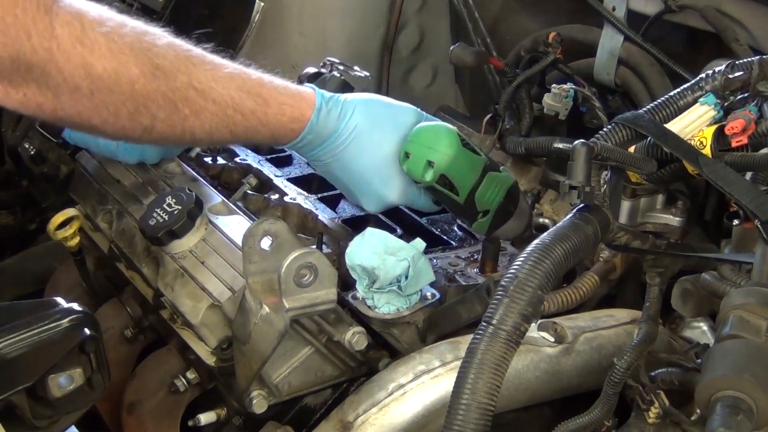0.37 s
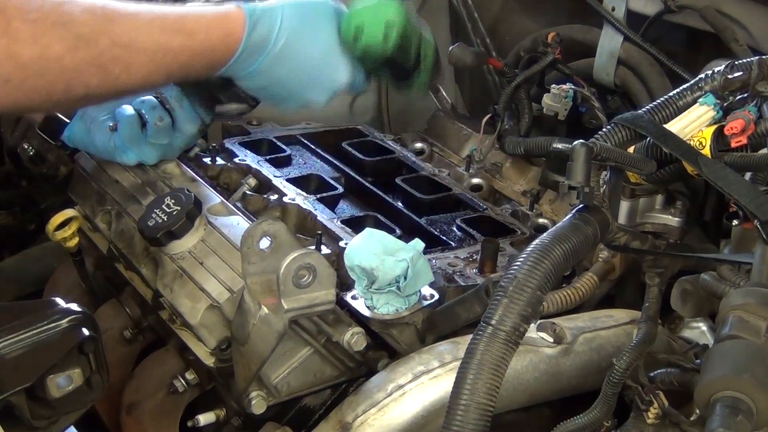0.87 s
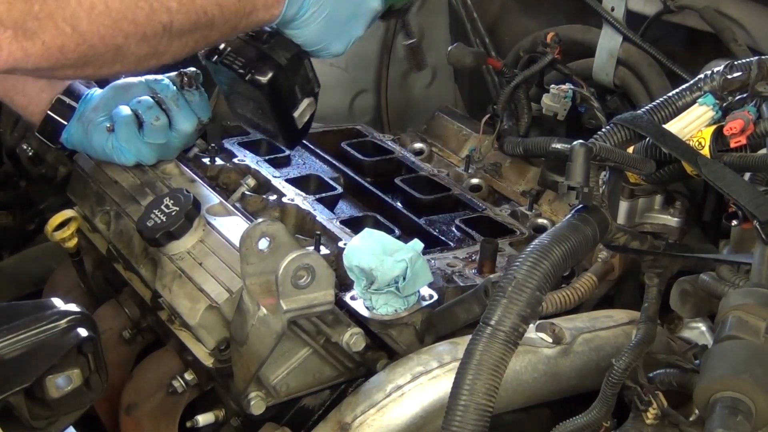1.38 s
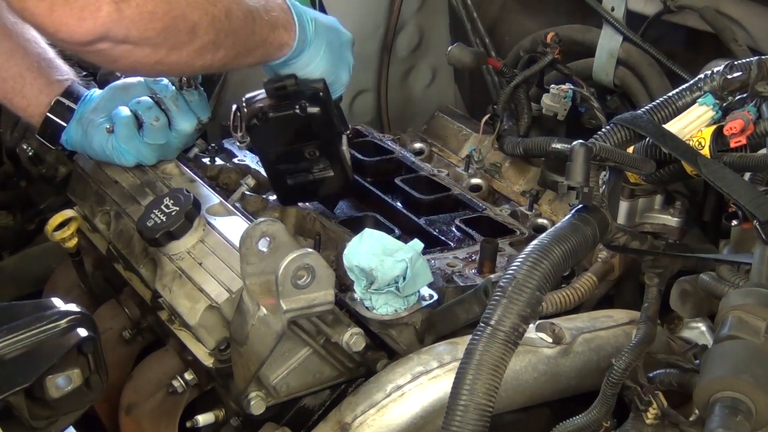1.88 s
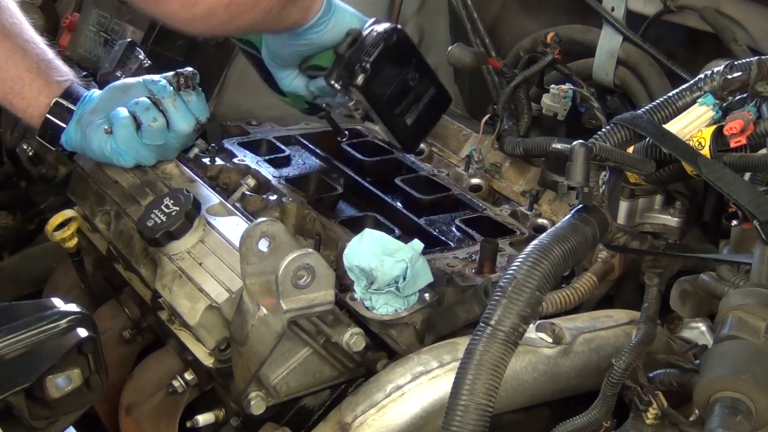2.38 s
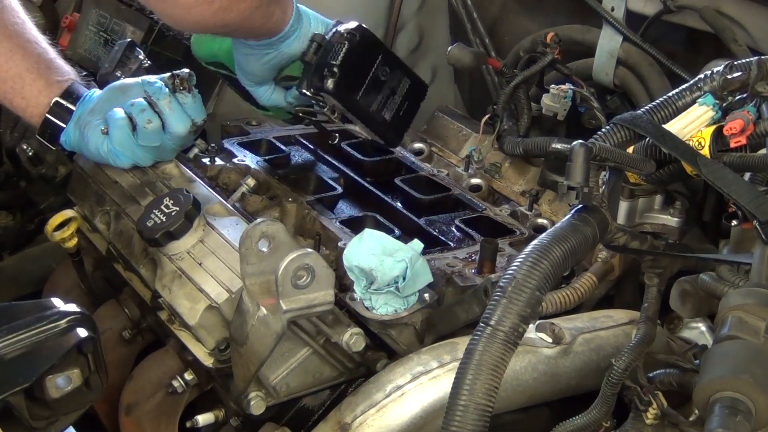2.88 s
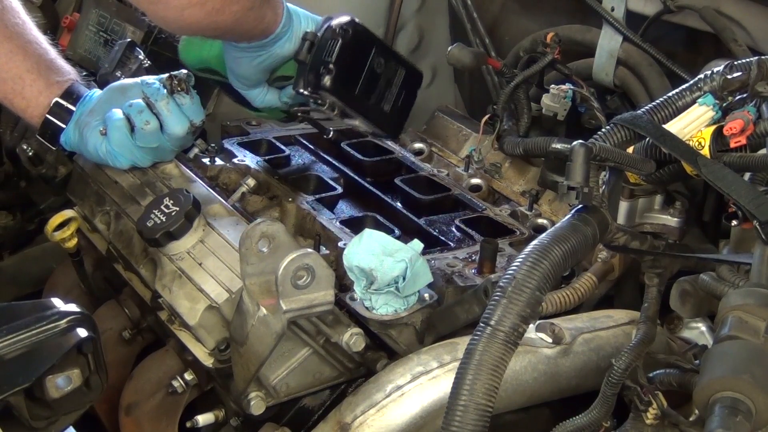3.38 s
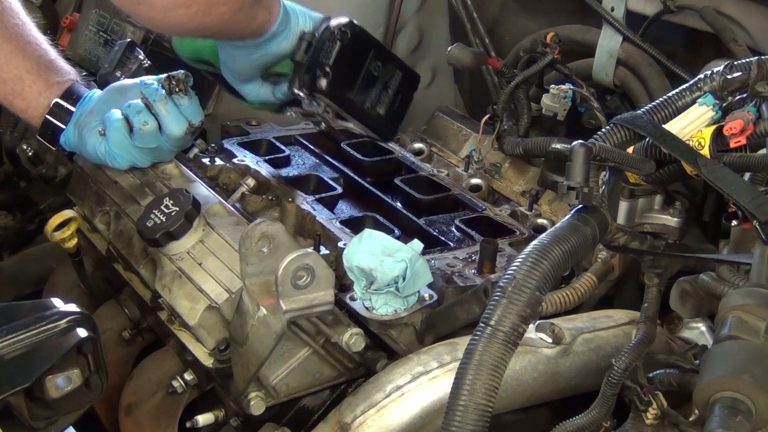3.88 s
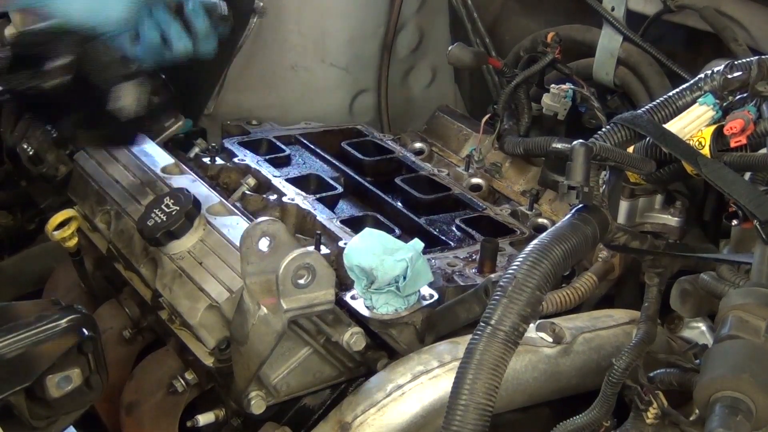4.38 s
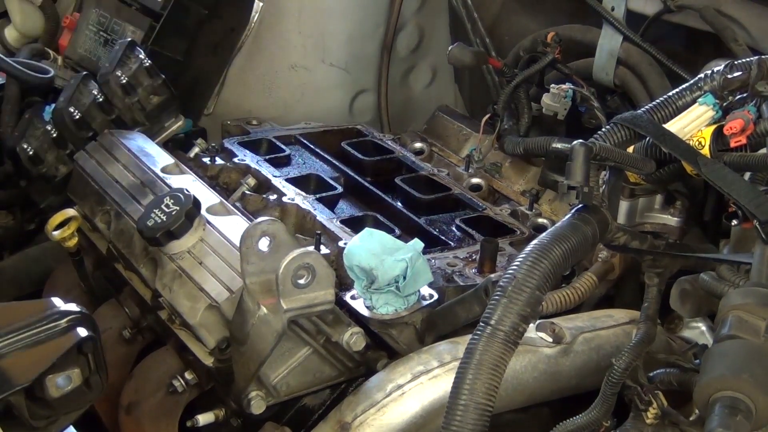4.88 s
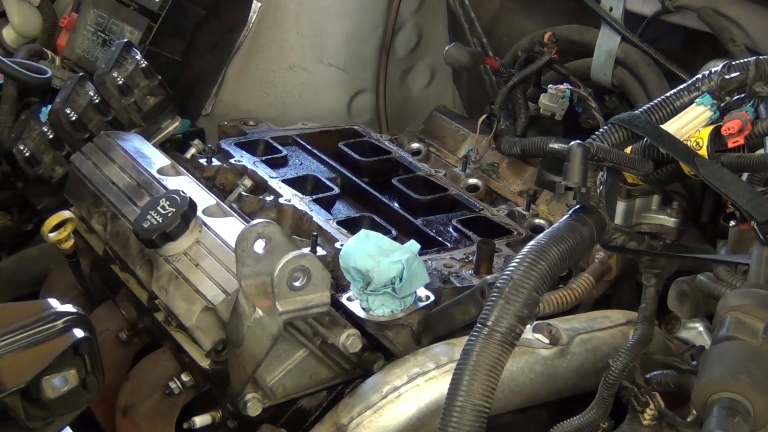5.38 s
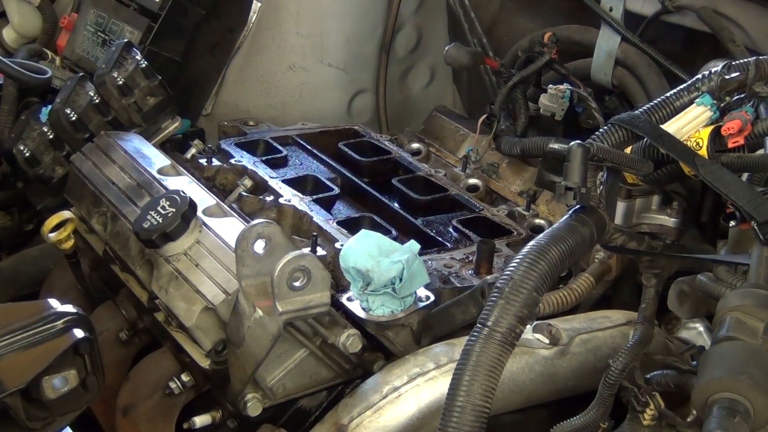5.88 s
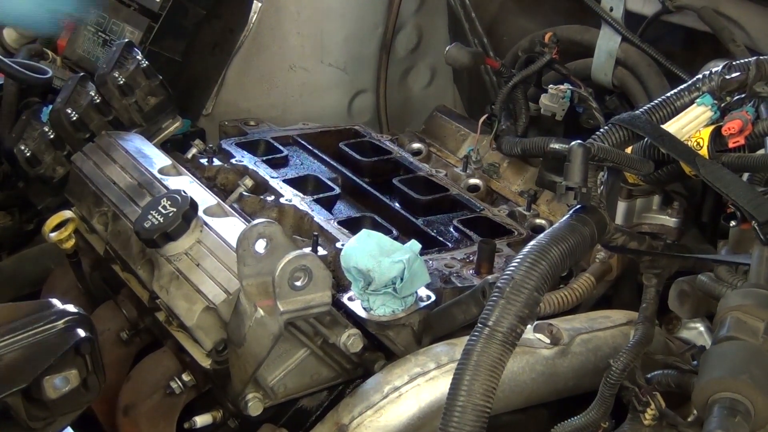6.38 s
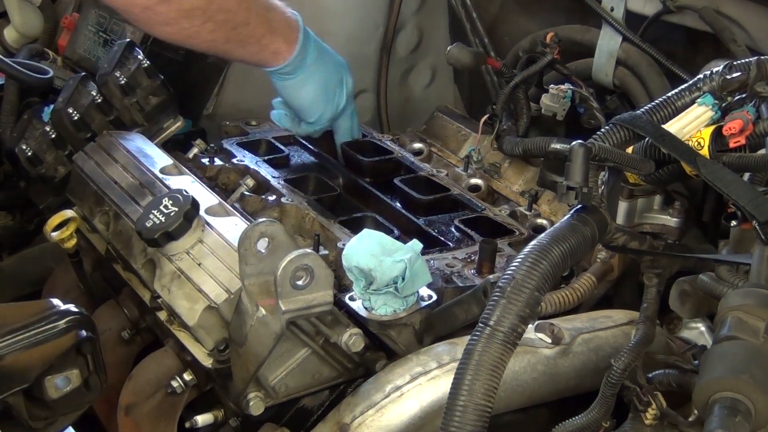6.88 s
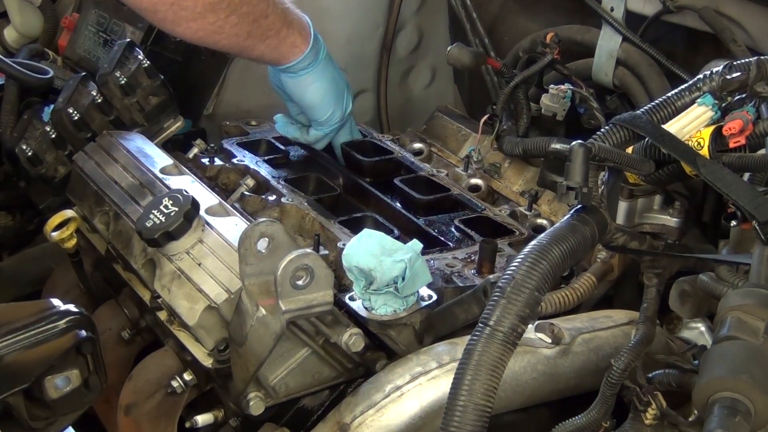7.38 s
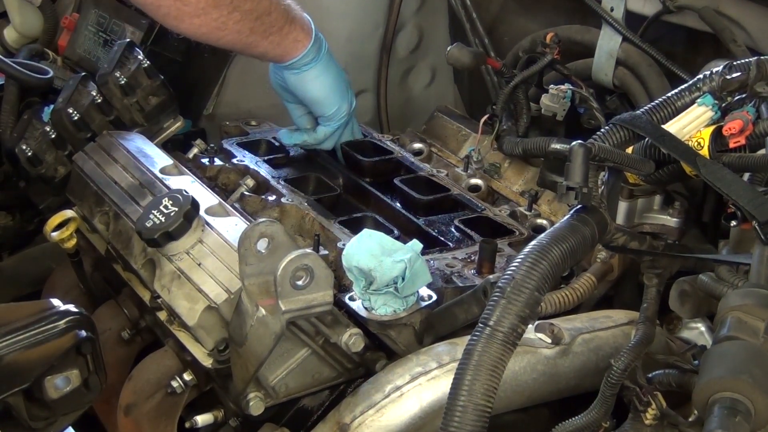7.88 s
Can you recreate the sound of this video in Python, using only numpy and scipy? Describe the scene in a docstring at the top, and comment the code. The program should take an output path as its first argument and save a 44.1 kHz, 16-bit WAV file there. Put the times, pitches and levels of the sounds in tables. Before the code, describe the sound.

In a garage with steady fan air and faint mains hum, small metal clicks lead to a cordless driver's short rising whir, cut off by its brake. A second, slightly shorter burst follows. Parts scrape and tick, then drop loudly into a thin metal tray, which clatters, rings and thuds twice. Faint glove rustles end it. Close stereo microphone, driver central, moderate hard-walled echo.

```python
"""A garage, where a small cordless driver runs two short bursts over an engine. Its speed control whines,
its gear teeth gate hiss and casing noise and sound tones at multiples of the mesh rate, and a brake ends each.
Bit and bolts tick on metal as cracks, rings and knocks; friction grains scrape and rustle as parts rub.
Parts dropped into a sheet-metal tray excite its modes and rattle. Mains harmonics and filtered fan noise
fill the room, and the walls return decaying echoes."""
import sys
import numpy as np
from scipy import signal
from scipy.fft import rfft, irfft, next_fast_len
from scipy.io import wavfile
from scipy.ndimage import uniform_filter1d, map_coordinates

SR = 44100
rng = np.random.default_rng(int(sys.argv[2]) if len(sys.argv) > 2 else 0)


def gain_from_decibels(decibels):
    """Convert decibel values to linear amplitude factors."""
    exponent = np.asarray(decibels, float) / 20
    return 10 ** exponent


def master(y):
    """Save y as 16-bit WAV."""
    cut = np.clip(np.atleast_2d(y).T, -1, 1)
    pcm = np.round(cut * 32767)  # scale
    wavfile.write(sys.argv[1], SR, pcm.astype(np.int16))


N = 352623
T = np.arange(N) / SR

# Spectra give relative dB per Hz, since each noise is afterwards scaled to its level.
# Fan air. Each row: frequency in Hz, density in dB per Hz.
AIR_SPECTRUM = [(15, -64), (25, -26), (102, -10.5), (301, -9), (363, -9), (659, -9.5), (1130, -13.5),
                (1520, -9), (2160, -18), (2990, -17.5), (3920, -19.5), (4370, -20), (7920, -22),
                (11000, -21), (16000, -21.5)]
# Resonances of the fan housing. Each row: centre in Hz, width in Hz, gain in dB.
HOUSING_MODES = [(430, 71, 5.5), (1526, 146, 6), (3027, 94, 10.5), (4420, 164, 7), (5850, 100, 5.5),
                 (10000, 370, 5.5), (10680, 200, 8.5), (11500, 370, 6.5), (12600, 230, 6.5),
                 (14000, 400, 3.5)]
# Width of the fan air. Each row: frequency in Hz, side over mid in dB.
AIR_SIDE_LEVEL = [(60, -33), (180, -18), (550, -12), (1650, -7), (4970, -5), (15000, -8.5)]
# Balance of the background. Each row: frequency in Hz, left over right in dB.
AIR_BALANCE = [(60, -0.5), (180, 1), (550, 0.5), (1650, 2.5), (4970, 0.5), (15000, 0.5)]
# Mains hum. Each row: multiple of 120 Hz, level in dB.
MAINS_HARMONICS = [(1, -73.5), (2, -69.5), (3, -57.5), (4, -62), (6, -69), (10, -87), (11, -67.5),
                   (13, -73.5), (15, -69.5), (17, -72.5), (19, -78), (20, -80), (24, -72)]
# A thin high whistle. One row: frequency in Hz, level in dB.
WHISTLE = (15734, -77)

# Reverberation. Each row: frequency in Hz, time to decay by 60 dB in seconds.
GARAGE_T60 = [(150, 0.92), (1000, 0.95), (3000, 0.63), (8000, 0.44), (15000, 0.063)]
# Width of the reverberation. Each row: frequency in Hz, side over mid in dB.
GARAGE_SIDE_LEVEL = [(200, -16), (1000, -12.5), (3000, -10.5), (6000, -15), (12000, -36)]

# Gloves and loose parts rubbing. Each row: start in seconds, length in seconds, scrape in dB, rustle in dB.
RUB_STROKES = [(1.002, 0.12, -56, -52), (2.368, 0.086, -62, -68), (4.542, 0.082, -59, -57),
               (4.858, 0.027, -39, -56), (4.896, 0.057, -44.5, -51), (5.03, 0.083, -46, -64),
               (5.085, 0.057, -49, -66), (5.393, 0.045, -50, -70), (6.791, .05, -55, -56),
               (7.02, .08, -55, -64), (7.232, 0.044, -58, -67)]
# Dull part of the friction. Each row: frequency in Hz, density in dB per Hz.
SCRAPE_SPECTRUM = [(400, -48), (800, 5), (2200, -6), (4500, -10), (7000, -18)]
# Bright part of the friction. Each row: frequency in Hz, density in dB per Hz.
RUSTLE_SPECTRUM = [(2500, -28), (5500, -7), (10000, 6), (14000, -9), (16000, -20)]

# Contacts of small parts. Each row: start in seconds, level in dB, ring in Hz,
# knock in dB relative to that level, knock in Hz.
CONTACTS = [(0.3907, -24.5, 4280, -35, 1310), (0.401, -25.5, 4280, -30, 750),
            (0.4044, -43, 4480, -25, 1290), (0.6194, -43.5, 1980, 1, 483), (1.8277, -39.5, 2190, -3, 950),
            (2.0063, -35, 2280, 3, 797), (2.0104, -38, 2780, 5.5, 548), (2.1234, -25, 5330, -12, 630),
            (2.3339, -28.5, 4460, -8, 1140), (2.3468, -21, 2160, 2.5, 750), (2.5087, -31, 8400, -23, 720),
            (2.8924, -13.5, 3710, -7.5, 840), (3.6671, -28, 3880, -1.5, 535), (4.2, -38.5, 10000, -23, 482),
            (4.5359, -40, 4300, 6.5, 2400), (4.8502, -17.5, 1850, 2, 862), (4.8843, -28, 4800, -6, 750),
            (4.903, -23.5, 6200, -9, 1440), (4.9364, -32, 1830, 1, 850), (5.0, -24.5, 1770, -1, 825),
            (5.0844, -48, 3900, 7, 2240), (5.1094, -50, 810, 12, 2210), (5.3914, -44, 2900, 17, 1210),
            (5.6385, -7, 3970, -25, 1104), (6.0176, -26.5, 1740, 6, 470)]
# First crack of a contact. Each row: frequency in Hz, density in dB per Hz.
CRACK_SPECTRUM = [(400, -3.5), (1500, 0.5), (4000, 0.5), (9000, -4.5), (13000, -5.5), (16000, -20)]
CRACK_T60_S, RING_T60_S, KNOCK_T60_S = 0.041, 0.025, 0.039
# Place of the small and dropped parts. Each row: time in seconds, left over right in dB.
PARTS_BALANCE = [(.4, -3.5), (2.3, 2), (3.6, 2), (5, 3.5), (5.6, 2.5)]

# Modes of the tray. Each row: frequency in Hz, relative level in dB, time to decay by 60 dB in seconds.
TRAY_MODES = [(1050, -7, 0.88), (1110, -5, 0.3), (1565, 7.5, 0.6), (1840, 0, 0.4), (2040, -1, 0.52),
              (2400, -12, 0.39), (2584, -9, 0.32), (2590, -20, 0.48), (2925, -1, 0.45), (3520, -3, 0.51),
              (4040, -14, 0.7), (4100, -1, 0.61), (4260, -19, 0.58), (4807, -5, 0.59), (4775, 1, 0.23),
              (5690, 5, 0.21), (6640, -16, 0.24), (6713, -22, 0.39), (7340, -18, 0.41), (7350, -3.5, 0.33),
              (7680, 11, 0.053), (8600, -14, 0.28)]
# Landings in the tray. Each row: start in seconds, level in dB, softness in dB taken off the clatter.
TRAY_LANDINGS = [(5.638, 0.5, 1), (5.658, 5, 11), (5.703, 4.5, 41.5), (5.96, -5, 26), (6.001, -1.5, 27.5),
                 (6.028, -2.5, 49.5)]
# Layers of a landing: clatter, body, thud, boom. Each row: level in dB, share of the softness lost
# (negative: gained), rise constant in seconds, time to decay by 60 dB in seconds.
LANDING_LAYERS = [(-15.5, 1, 0.0033, 0.33), (-17.5, 0.48, 0.0097, 0.22), (-30.5, 0.08, 0.0063, 0.25),
                  (-51, -0.5, .022, 0.24)]
# Rattle of the sheet. Each row: frequency in Hz, density in dB per Hz.
CLATTER_SPECTRUM = [(1060, -49), (1800, -8.5), (2690, 0), (4450, -4.5), (7420, -10), (13900, -24),
                    (15300, -40), (16000, -81)]
# Middle range of a landing. Each row: frequency in Hz, density in dB per Hz.
BODY_SPECTRUM = [(500, -28), (850, -0.5), (1410, 0.5), (1580, -5.5), (2200, -16), (2860, -38), (4840, -120)]
# Low blow of a landing. Each row: frequency in Hz, density in dB per Hz.
THUD_SPECTRUM = [(210, -50), (350, -30), (459, -2), (626, -9), (950, -11), (1240, -32), (2090, -120)]
# Deepest part of a landing. Each row: frequency in Hz, density in dB per Hz.
BOOM_SPECTRUM = [(47, -56), (80, -22), (188, -1.5), (297, -5), (329, -5), (420, -1.5), (550, -39.5),
                 (920, -120)]

# Rotor speed, one list for each burst. Each row: time in seconds, gear mesh rate in Hz.
ROTOR_SPEED = [
    [(2.524, 530), (2.545, 980), (2.575, 1420), (2.591, 1625), (2.61, 1675), (2.7, 1780), (2.783, 1842),
     (2.85, 1712), (2.88, 1620)],
    [(3.25, 108), (3.264, 230), (3.274, 500), (3.294, 880), (3.317, 1170), (3.348, 1635), (3.375, 1715),
     (3.41, 1685), (3.47, 1540)],
]
# Levels at full speed, one row for each burst. Each row: start of braking in seconds, hiss in dB,
# casing noise in dB, second-order whine in dB, other orders in dB.
BURST_LEVELS = [(2.855, -18, -26.5, -26, -32.5), (3.443, -18, -34, -27.5, -32)]
# Weaker tones of the mesh. Each row: multiple of the mesh rate, dB relative to the other-orders level.
MESH_TONES = [(1, 0), (3, 2), (4, -2), (5, -4), (6, -1)]
# Low tones in the casing. Each row: multiple of the mesh rate, dB relative to the casing noise level.
SHAFT_TONES = [(1 / 8, -29.5), (2 / 8, -23), (.81, -10)]
# Case modes that the rising tones pass. Each row: centre in Hz, width in Hz, gain in dB.
WHINE_MODES = [(1450, 250, 0.5), (2340, 83, 13.5)]
# Hiss of the teeth. Each row: frequency in Hz, density in dB per Hz.
HISS_SPECTRUM = [(820, -32.5), (1400, -4), (2890, -11.5), (3610, -8.5), (3960, -9), (5320, -2.5),
                 (6330, -10.5), (7300, -7.5), (10500, -5.5), (14600, -14.5), (16000, -24)]
# Gear case resonances that colour the hiss. Each row: centre in Hz, width in Hz, gain in dB.
GEAR_CASE_MODES = [(1550, 710, -1.5), (2300, 250, 3.5), (3240, 470, 5), (5300, 630, -3.5), (7080, 320, 4),
                   (8800, 310, 1.5), (9600, 790, 2.5)]
# Casing noise. Each row: frequency in Hz, density in dB per Hz.
CASING_SPECTRUM = [(59, -69), (100, -60), (207, -8.5), (262, -17.5), (446, -6), (489, -11.5), (599, -2.5),
                   (718, 3.5), (964, -2.5), (1500, -8), (1950, -39), (3300, -120)]
# Speed control as the rotor starts. Each row: start in seconds, length in seconds, level in dB, climb in Hz.
SPEED_CONTROL = [(2.514, 0.014, -39, 1300), (3.229, 0.033, -39, 300)]
FULL_HZ, ENGAGED_HZ = 1740, 463  # mesh rate at full speed; below the second the teeth barely load
HISS_DB_PER_OCTAVE, CASING_DB_PER_OCTAVE, ORDERS_DB_PER_OCTAVE = 2, 12.5, 3
IDLE_DB_PER_OCTAVE = 9.5  # further loss of noise below the engaged rate
WHINE_STARTS_HZ, WHINE_RISE_DB_PER_OCTAVE = 930, 45  # the tones set in steeply up to this mesh rate
SLOWING_DB_PER_OCTAVE = 40  # tones fade as the rotor sags below its best speed
BRAKE_TONES_DB_PER_S, BRAKE_NOISE_DB_PER_S = 900, 198
CHOPPER_HZ = 5030  # starting pitch of the speed control


def unit(x):
    """Normalisation to rms 1."""
    return x / np.sqrt(np.mean(x ** 2) + 1e-20)


def along(points, hz):
    """Interpolation of (Hz, value) points on a logarithmic frequency axis."""
    f, v = np.transpose(points)
    return np.interp(np.log(hz + 1), np.log(f + 1), v)


def wobble(rate, size):
    """A smooth random curve through normal deviates, rate knots a second."""
    knots = rng.standard_normal(int(size * rate / SR) + 4)
    return map_coordinates(knots, [np.arange(size) * rate / SR])


def filtered(x, response):
    """Linear filtering: the spectrum of x times a response of frequency."""
    m = next_fast_len(x.shape[-1] + 8192)
    spectrum = rfft(x, m) * response(np.fft.rfftfreq(m, 1 / SR))
    return irfft(spectrum, m)[..., :x.shape[-1]]


def coloured(x, spectrum):
    """Noise shaped by a spectrum, then set to rms 1."""
    return unit(filtered(x, lambda hz: gain_from_decibels(along(spectrum, hz))))


def lift(modes, hz):
    """Resonance: unit gain with a hump at each mode."""
    return 1 + sum((gain_from_decibels(db) - 1) / (1 + (2 * (hz - c) / w) ** 2) for c, w, db in modes)


def patchy(x, patch_db):
    """Random gain in small patches of time and frequency."""
    z = signal.stft(x, nperseg=128)[2]
    field = uniform_filter1d(rng.standard_normal(z.shape), size=2, axis=0)
    field = uniform_filter1d(field, size=5, axis=1)
    return signal.istft(z * gain_from_decibels(patch_db * unit(field)), nperseg=128)[1][:len(x)]


def swell(length_s, attack):
    """An envelope that rises over a share of its length, then falls back to silence."""
    u = T[:round(length_s * SR)] / length_s
    return np.sin(np.pi / 2 * np.minimum(u / attack, (1 - u) / (1 - attack))) ** 2


def add(track, first, sound):
    """Superposition of a sound on the track from its first sample."""
    track[first:first + len(sound)] += sound


def wide(pair):
    """Sum and difference of mid and side give left and right."""
    return np.array([pair[0] + pair[1], pair[0] - pair[1]])


def background():
    """Broadband fan air resonates in its housing; unsteady mains harmonics and a whistle join it (mid, side)."""
    def response(hz):
        side = gain_from_decibels(along(AIR_SIDE_LEVEL, hz))
        return gain_from_decibels(along(AIR_SPECTRUM, hz)) * lift(HOUSING_MODES, hz) * np.array([np.ones_like(side), side])

    pair = filtered(rng.standard_normal((2, N)), response)
    air = gain_from_decibels(-49.5 + 0.14 * wobble(3.34, N)) * pair / np.std(pair[0])
    for hz, db in [(120 * k, db) for k, db in MAINS_HARMONICS] + [WHISTLE]:
        level = np.sqrt(2) * gain_from_decibels(db + 2.66 * wobble(6, N))
        air[0] += level * np.sin(2 * np.pi * (hz * T + rng.random()))
    return air


def garage(x):
    """Reverberation as convolution with decaying noise, shorter in the treble and redrawn in steps (mid, side)."""
    out, step = np.zeros((2, N + 2 * SR)), SR // 8
    delay = 250  # samples before the echo begins
    for first in range(0, N, step):
        hz, t, z = signal.stft(rng.standard_normal((2, SR * 3 // 4)), SR, nperseg=256)
        z[1] *= gain_from_decibels(along(GARAGE_SIDE_LEVEL, hz))[:, None]
        walls = gain_from_decibels(-60 * t / along(GARAGE_T60, hz)[:, None])
        nearby_metal = gain_from_decibels(-0.5 - 60 * t / 0.047)
        tail = signal.istft(z * (walls + nearby_metal), SR, nperseg=256)[1]
        tail /= np.linalg.norm(tail[0])
        wet = signal.fftconvolve(x[None, first:first + step], tail, axes=1)
        out[:, first + delay:first + delay + wet.shape[1]] += wet
    return out[:, :N]


def rubs():
    """Friction as clumped random grains, heard as a dull scrape and a bright rustle."""
    out, size = np.zeros(N), SR // 4
    for s, length_s, scrape_db, rustle_db in RUB_STROKES:
        stroke = swell(length_s, attack=0.25)
        grains = gain_from_decibels(3.1 * wobble(203.0, size)) * rng.standard_normal((2, size))
        scrape = gain_from_decibels(scrape_db) * coloured(grains[0], SCRAPE_SPECTRUM)
        rustle = gain_from_decibels(rustle_db) * coloured(grains[1], RUSTLE_SPECTRUM)
        add(out, round(s * SR), stroke * (scrape + rustle)[:len(stroke)])
    return out


def ticks():
    """Impact excites a crack, a short ring of the small part and a knock of what it touches."""
    out, t = np.zeros(N), T[:SR // 5]
    attack = 1 - np.exp(-t / 0.0003)
    for s, db, ring_hz, knock_db, knock_hz in CONTACTS:
        noise = rng.standard_normal((3, len(t)))
        crack = gain_from_decibels(-7.5 - 60 * t / CRACK_T60_S) * coloured(noise[0], CRACK_SPECTRUM)
        # accumulated noise lets each phase drift
        ring_phase = 2 * np.pi * ring_hz * t + 0.25 * np.cumsum(noise[1])
        knock_phase = 2 * np.pi * knock_hz * t + 0.13 * np.cumsum(noise[2])
        ring = gain_from_decibels(-3 - 60 * t / RING_T60_S) * np.sin(ring_phase)
        knock = gain_from_decibels(knock_db - 60 * t / KNOCK_T60_S) * np.sin(knock_phase)
        add(out, round(s * SR), gain_from_decibels(db) * attack * (crack + ring + knock))
    return out


def tray():
    """Modal ringing of a struck sheet under its rattle; soft landings lose clatter most and gain boom."""
    first, size = round(TRAY_LANDINGS[0][0] * SR), SR * 3 // 4
    t = T[:size]
    bounces = gain_from_decibels(2.8 * wobble(250, size)) * rng.standard_normal((4, size))
    ring = np.zeros(size)
    for hz, db, t60 in TRAY_MODES:
        # close mode pairs blur the higher lines most: 0.0009 radians per Hz
        phase = 2 * np.pi * hz * t + 0.0009 * hz * wobble(73.7, size)
        ring += gain_from_decibels(db + rng.normal(0, 1.8) - 60 * t / t60) * np.sin(phase)
    blows = gain_from_decibels(-60 * t / 0.094) * bounces[0]
    out = np.zeros(N)
    add(out, first, gain_from_decibels(-33.0) * unit(signal.fftconvolve(blows, ring)[:size]))
    spectra = (CLATTER_SPECTRUM, BODY_SPECTRUM, THUD_SPECTRUM, BOOM_SPECTRUM)
    for (layer_db, share, rise_s, t60), noise, spectrum in zip(LANDING_LAYERS, bounces, spectra):
        power = np.zeros(size)
        for s, db, soft_db in TRAY_LANDINGS:
            since = np.maximum(t + T[first] - s, 0)
            decay = gain_from_decibels(layer_db + db - share * soft_db - 60 * since / t60)
            power += (decay * (1 - np.exp(-since / rise_s))) ** 2
        add(out, first, np.sqrt(power) * coloured(noise, spectrum))
    return out


def tooth_knocks(teeth, mesh_hz):
    """Each contact decays from its own random force; contacts overlap into a whir as the rate grows."""
    force_db = 2.5 * rng.standard_normal(int(teeth[-1]) + 1)[teeth.astype(int)]
    since_contact_s = (teeth % 1) / mesh_hz
    knock = gain_from_decibels(force_db - 60 * since_contact_s / 0.01)
    return knock / np.sqrt(uniform_filter1d(knock ** 2, size=900))


def mesh_tone(order, db, teeth, mesh_hz):
    """A harmonic of the mesh, modulated in level as the planet gears go round and in phase by backlash."""
    size = len(teeth)
    slack = np.cumsum(60 * wobble(200, size)) / SR  # smears the line by some Hz
    throb = 1 + 0.55 * np.cos(2 * np.pi * teeth / 22 + 1.5 * wobble(25, size))  # once in about 22 teeth
    level = gain_from_decibels(db + 4 * wobble(45, size)) * lift(WHINE_MODES, order * mesh_hz)
    return level * throb * np.sin(2 * np.pi * (order * teeth + slack))


def speed_control():
    """Switching current sounds as a rising tone with its second harmonic."""
    out = np.zeros(N)
    for s, length_s, db, climb_hz in SPEED_CONTROL:
        level = np.sqrt(2) * gain_from_decibels(db) * swell(length_s, attack=0.3)
        hz = CHOPPER_HZ + climb_hz * np.linspace(0, 1, len(level)) ** 2
        phase = 2 * np.pi * np.cumsum(hz) / SR
        add(out, round(s * SR), level * (np.sin(phase) + gain_from_decibels(-11) * np.sin(2 * phase)))
    return out


def driver():
    """Forced vibration: tooth contacts gate the hiss, shake the casing and whine at multiples of the mesh rate."""
    out = speed_control()
    for rotor, (brake_s, hiss_db, casing_db, whine_db, others_db) in zip(ROTOR_SPEED, BURST_LEVELS):
        times, speeds = np.transpose(rotor)
        first = round(times[0] * SR)
        t = T[first:round(times[-1] * SR)]
        mesh_hz, size = np.interp(t, times, speeds), len(t)
        teeth = np.cumsum(mesh_hz) / SR  # tooth contacts so far
        braking_s = np.maximum(t - brake_s, 0)

        def octaves_below(hz):
            return np.minimum(np.log2(mesh_hz / hz), 0)  # zero or negative

        slow = octaves_below(FULL_HZ)
        noise_db = IDLE_DB_PER_OCTAVE * octaves_below(ENGAGED_HZ) - BRAKE_NOISE_DB_PER_S * braking_s
        hiss_level = gain_from_decibels(hiss_db + HISS_DB_PER_OCTAVE * slow + noise_db)
        casing_level = gain_from_decibels(casing_db + CASING_DB_PER_OCTAVE * slow + noise_db)
        noise = tooth_knocks(teeth, mesh_hz) * rng.standard_normal((2, size))
        hiss = coloured(patchy(noise[0], patch_db=2.5), HISS_SPECTRUM)
        hiss = unit(filtered(hiss, lambda hz: lift(GEAR_CASE_MODES, hz)))
        casing = coloured(noise[1], CASING_SPECTRUM)
        for order, db in SHAFT_TONES:
            casing += gain_from_decibels(db + 2.6 * wobble(38.0, size)) * np.sin(2 * np.pi * order * teeth)

        whine = mesh_tone(2, whine_db, teeth, mesh_hz)
        for order, db in MESH_TONES:
            whine += mesh_tone(order, db + others_db + ORDERS_DB_PER_OCTAVE * slow, teeth, mesh_hz)
        onset_db = WHINE_RISE_DB_PER_OCTAVE * octaves_below(WHINE_STARTS_HZ)
        sag_db = SLOWING_DB_PER_OCTAVE * octaves_below(np.maximum.accumulate(mesh_hz))
        whine *= np.sqrt(2) * gain_from_decibels(onset_db + sag_db - BRAKE_TONES_DB_PER_S * braking_s)
        fade = np.clip(np.minimum(T[:size] / 0.0047, T[size - 1::-1] / 0.014), 0, 1)
        add(out, first, fade * (whine + hiss_level * hiss + casing_level * casing))
    return out


def scene():
    """Superposition in left and right: a central driver and its reflections, panned parts, echo and background."""
    room = filtered(wide(background()), lambda hz: gain_from_decibels(along(AIR_BALANCE, hz) * [[0.5], [-0.5]]))
    # small parts are too small to radiate bass
    small = filtered(rubs() + ticks(), lambda hz: 1 / np.sqrt(1 + (430 / (hz + 1)) ** 6))
    dropped, tool = tray(), driver()
    echo = wide(garage(gain_from_decibels(-10.0) * tool + gain_from_decibels(-11.5) * small + gain_from_decibels(-9.5) * dropped))
    lean_db = np.interp(T, *np.transpose(PARTS_BALANCE)) / 2
    parts = (small + dropped) * gain_from_decibels([lean_db, -lean_db])
    # panels on either side reflect the driver, delayed by 70 and 110 samples
    bonnet = gain_from_decibels([[-17], [-30]]) * np.array([np.roll(tool, shift=70), np.roll(tool, shift=110)])
    bonnet = filtered(bonnet, lambda hz: 1 / np.sqrt(1 + (hz / 9500) ** 4))
    return tool + bonnet + parts + echo + room


def band_limit(x):
    """A steep low-pass at the top of the band."""
    return signal.sosfilt(signal.butter(12, 16480, fs=SR, output="sos"), x)


def record(dry):
    """Saturation at the input rounds off peaks; band limiting drops deep bass and the top treble."""
    rounded = dry / (1 + np.abs(dry / 0.8) ** 4) ** 0.25
    mix = filtered(rounded, lambda hz: (hz < 15750) / np.sqrt(1 + (50 / (hz + 1)) ** 4))
    return band_limit(mix)


dry = scene()
out = record(dry)
master(out)
```